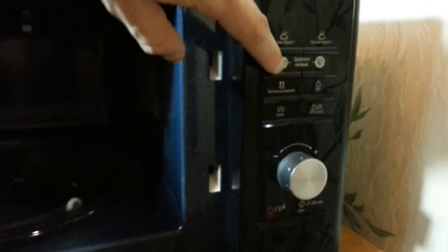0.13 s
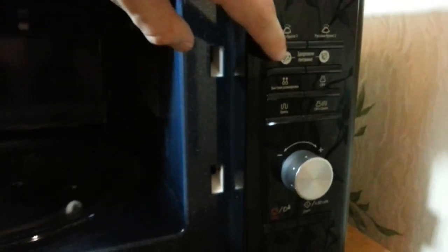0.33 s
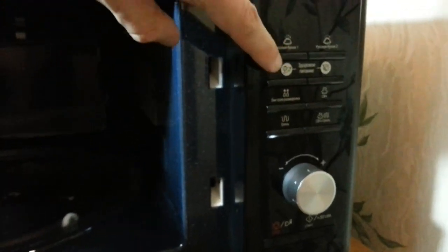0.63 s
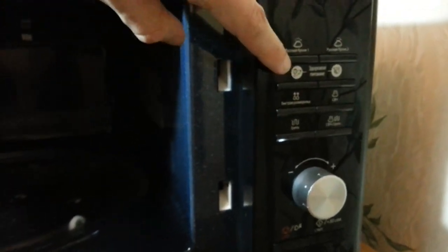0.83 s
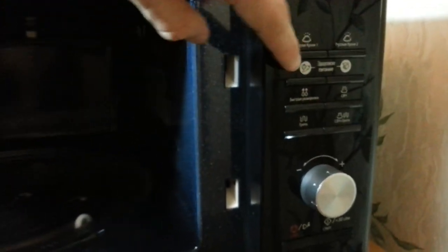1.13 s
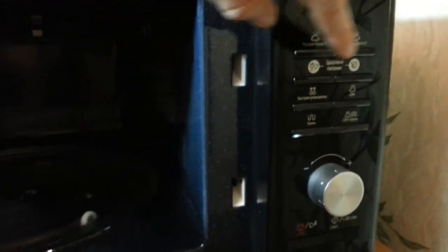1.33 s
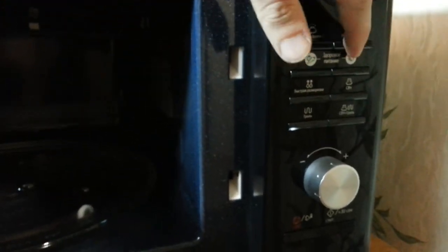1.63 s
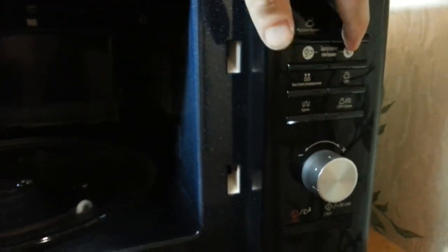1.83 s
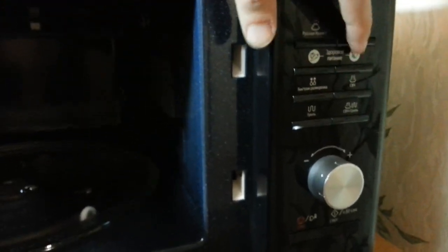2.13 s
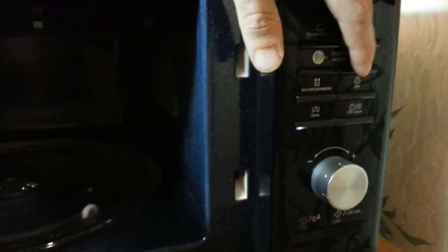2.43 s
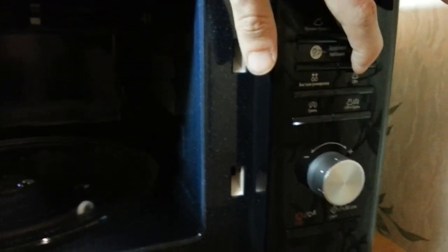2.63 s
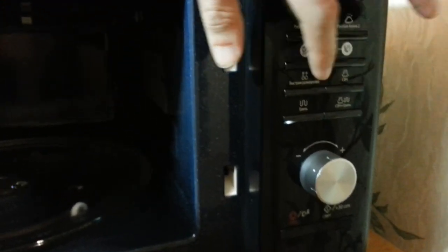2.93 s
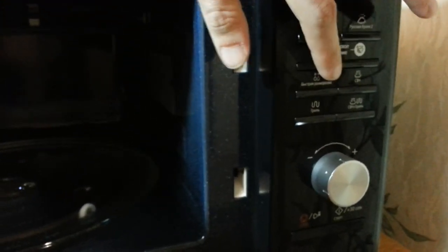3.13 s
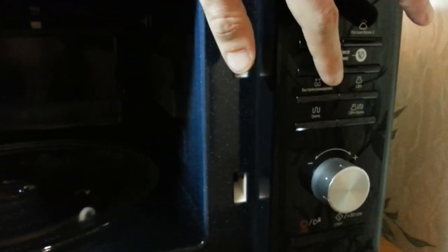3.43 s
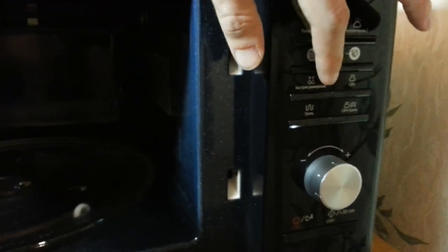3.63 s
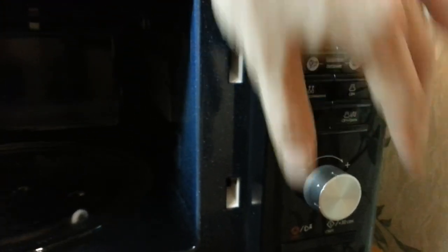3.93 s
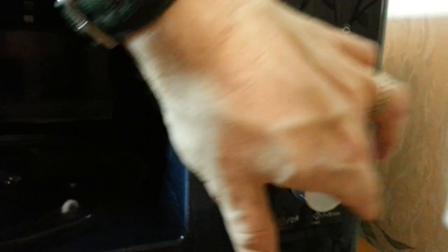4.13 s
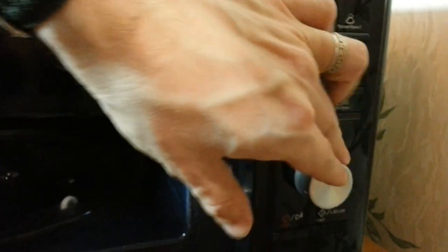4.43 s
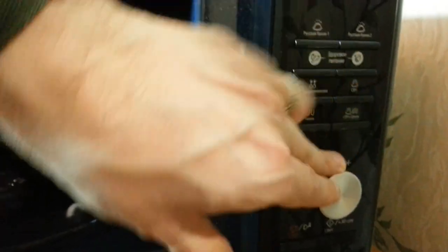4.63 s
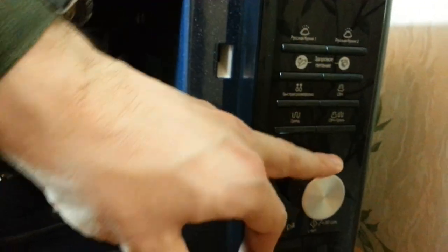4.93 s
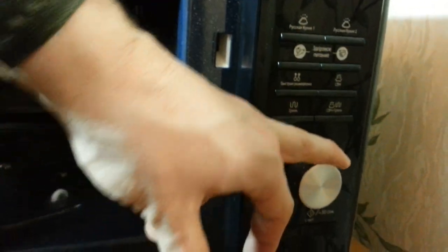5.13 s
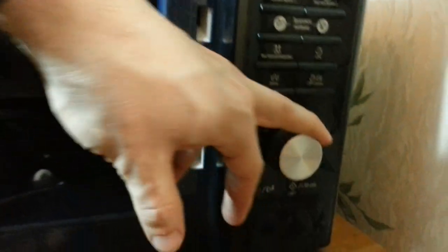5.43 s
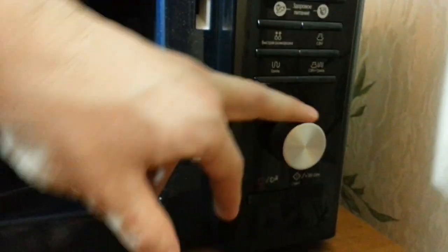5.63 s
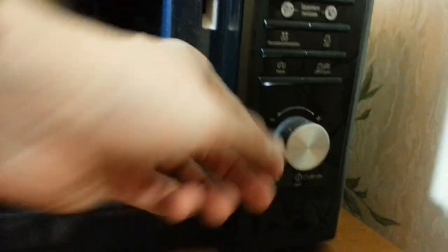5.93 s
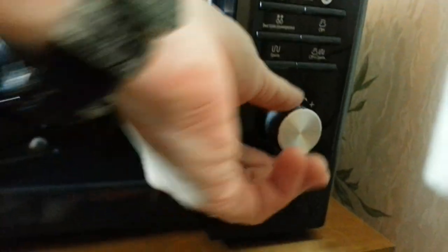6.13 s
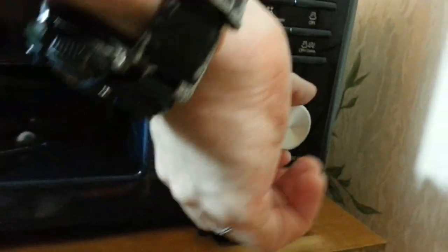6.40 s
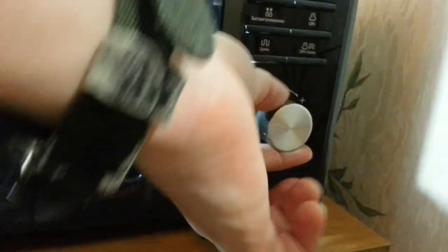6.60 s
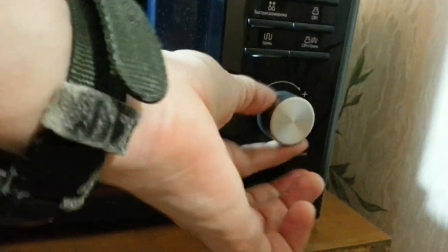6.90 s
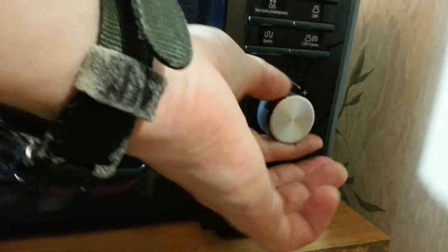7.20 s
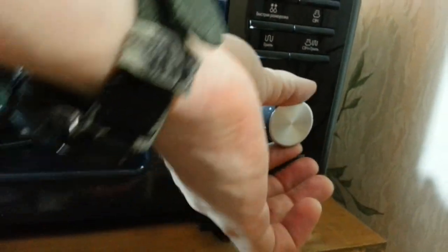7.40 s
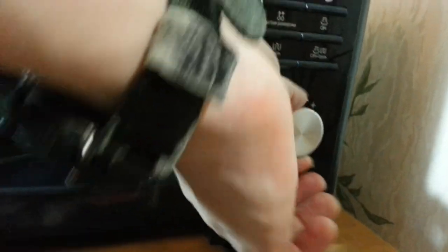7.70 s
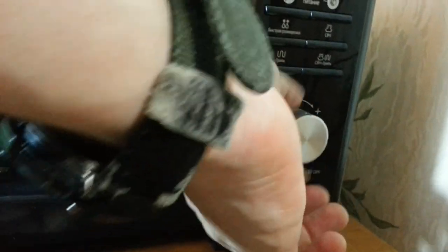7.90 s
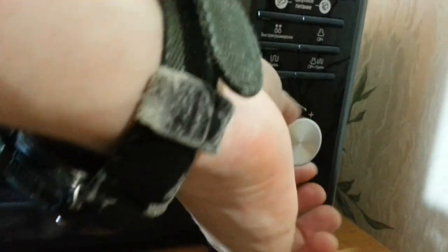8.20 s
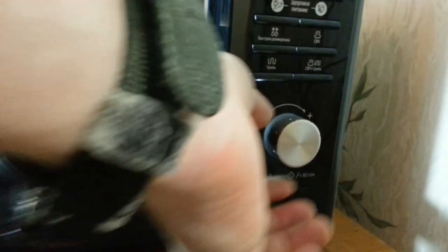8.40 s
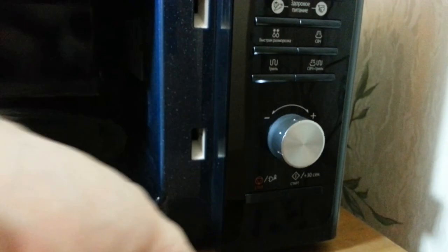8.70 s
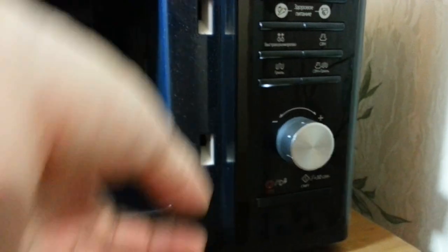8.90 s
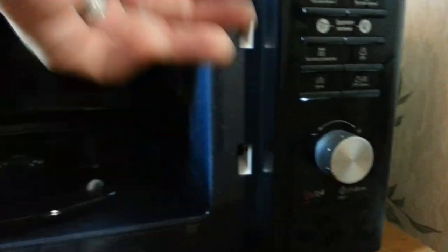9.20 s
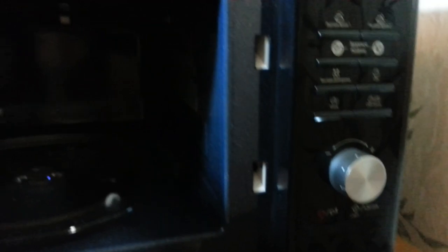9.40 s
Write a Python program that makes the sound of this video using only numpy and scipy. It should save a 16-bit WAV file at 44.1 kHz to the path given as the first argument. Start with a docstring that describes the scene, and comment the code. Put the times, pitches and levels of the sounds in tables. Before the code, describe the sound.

Firm plastic button clicks and finger knocks on a microwave panel over a low wavering hum, then a notched dial rasping and a strap ticking.

```python
"""A hand works the front panel of an open microwave oven in a small room, close to the microphones.
A low wavering hum, summed from steady tones and dull noise, and a faint hiss of noise run throughout.
Push buttons, as noise bursts and clicks ringing the panel, snap over them and swell the hum; soft
brushes of grainy noise and thin falling squeaks come between. Later, lumpy noise rumbles in the case,
the dial rasps through its soft steps in swells of slips, and a watch strap ticks in tiny bright snaps."""
import sys
import numpy as np
from scipy import signal
from scipy.fft import rfft, irfft
from scipy.io import wavfile

SR = 44100
rng = np.random.default_rng(int(sys.argv[2]) if len(sys.argv) > 2 else 0)


def put_to_file(sound):
    """Save the sound as 16-bit audio at rate SR, in the file named by the first command-line argument."""
    columns = np.atleast_2d(sound).T  # one column per channel
    safe = np.clip(columns, -1, 1)
    whole_steps = np.round(safe * 32767)
    wavfile.write(sys.argv[1], SR, whole_steps.astype(np.int16))


N = 421155  # length in samples

# Likeness of left and right noise. Each row: frequency in Hz, correlation from 0 to 1.
LIKENESS = [(50, 0.94), (130, 0.88), (300, 0.6), (640, 0.54), (1400, 0.033), (15000, 0.034)]
# Steady tones of the hum. Each row: frequency in Hz, level in dB, left-right difference in dB.
HUM_TONES = [(48.4, -66, 9.5), (72.8, -70.5, 2), (99.8, -53.5, 8), (124, -67.5, 0), (218.8, -59.5, 6.5),
             (345, -73.5, 1.5)]
# Relative course of the hum between blows. Each row: time in seconds, level in dB.
HUM_COURSE = [(0.0, -59), (0.66, -61), (1.04, -54.5), (1.62, -59), (2.1, -55.5), (2.47, -56.5),
              (3.27, -57.5), (4.18, -59), (4.6, -55.5), (4.76, -57.5), (5.8, -55.5), (6.38, -58),
              (6.99, -55.5), (9.55, -59.5)]
# Spectrum of the dull drone. Each row: frequency in Hz, density in dB per Hz.
DRONE_SPECTRUM = [(20, -22), (45, -12), (80, -7), (120, -10), (170, 0.5), (230, -2.5), (340, -5),
                  (450, -11.5), (700, -32.5), (1500, -33.5)]
# Spectrum of the room hiss. Each row: frequency in Hz, density in dB per Hz.
AIR_SPECTRUM = [(240, -23.5), (400, -3), (1120, -17), (1370, -16.5), (1470, -18.5), (2090, -17.5),
                (4010, -18), (4390, -20.5), (13900, -23), (15000, -36)]
# Button presses and finger knocks. Each row: start in seconds, snap level in dB, then thump, knock
# and edge in dB against the snap, knock pitch in Hz, snap pitch in Hz.
BLOWS = [(0.055, -45.5, -4, -3, -15.5, 703, 2440), (0.5833, -17.5, -22.5, -22, -13, 1260, 2500),
         (0.7717, -38, -3.5, -6, -17.5, 587, 3130), (0.8903, -20, -23.5, -21, -19, 1360, 2320),
         (1.0192, -39.5, 0, -5.5, -20.5, 580, 2240), (1.0919, -17, -19.5, -23.5, -15.5, 1255, 2500),
         (1.2385, -43.5, 4.5, -4, -19, 606, 2180), (1.806, -18, -18.5, -22, -16, 666, 2230),
         (1.9558, -30, -6, -9, -9.5, 960, 2440), (2.0474, -19, -19.5, -18.5, -18, 1440, 2020),
         (2.2097, -26.5, -6, -12, -10.5, 656, 1760), (2.368, -33.5, -20.5, -24.5, -14, 640, 1760),
         (2.6959, -13, -22, -24, -18.5, 670, 2980), (2.877, -29.5, -8.5, -8.5, -17.5, 740, 1790),
         (2.8959, -39.5, -16.5, -14, -9.5, 830, 1800), (3.1974, -14.5, -26, -21, -15.5, 910, 2780),
         (3.34, -21.5, -10, -14.5, -6, 650, 2870), (3.36, -31, -17, -10, -32, 576, 2280),
         (3.8235, -46, -2, -10.5, -20, 783, 2160), (4.148, -37, -14.5, -17.5, -11, 556, 2480),
         (4.251, -48.5, -18.5, -27, -11, 522, 1970), (4.4033, -24.5, -7, -18, -11, 1130, 2370),
         (5.2318, -57, 11.5, 2.5, -15, 630, 2300), (5.46, -56.5, -8.5, -9, -9.5, 920, 2600),
         (5.7765, -38, -0.5, -6, -22, 680, 2150), (6.2094, -47.5, -5, -10, -20, 592, 2180),
         (6.6597, -46.5, 1, -11.5, -14, 530, 3060), (6.8785, -40.5, -2, -12, -22, 574, 2480),
         (7.1288, -46.5, 8.5, -5.5, -11, 670, 3200), (7.194, -48.5, 6.5, -6, -20, 507, 2690),
         (7.2615, -44.5, -3, -9.5, -17, 754, 2960), (8.7829, -24.5, -16, -16, -9, 590, 2150)]
# Decay of a blow in thump, knock, snap, edge and sparkle. Each row: low and high limit in Hz, rise in
# seconds, crack in dB against the tail, crack T60 in seconds, tail T60 in seconds, band level in dB.
BLOW_BANDS = [(135, 364, 0.00096, 13, 0.012, 0.4, -5.5), (475.6, 1365, 0.0018, -0.5, 0.045, 0.29, -2),
              (1567, 4150, 0.00044, 7, 0.029, 0.18, -14.5), (4290, 6980, 0.00023, 12, 0.038, 0.16, -3),
              (8260, 12800, 0.000217, 10, 0.016, 0.16, -7)]
# Resonances of the case and its plastic panel. Each row: frequency in Hz, width in Hz, gain in dB.
PANEL_MODES = [(152, 5.3, 7.5), (180.5, 4, 0.5), (226.8, 36, 6.5), (244, 30, -3), (328, 39, 0),
               (603, 120, 0.5), (705, 44, -4.5), (808, 5.1, 5.5), (938, 16, 4), (1288, 7.4, -21.5),
               (1760, 21, -13), (2030, 26, 7), (2200, 16, 4), (2650, 130, -3), (2840, 240, -9.5),
               (3340, 50, -8.5), (5330, 330, -5)]
# Bumps and brushes of hand and sleeve. Each row: start in seconds, peak level in dB before the
# common trim, length in seconds (the peak falls at half of it).
BRUSH_EVENTS = [(0.345, -61, 0.031), (0.452, -55, 0.028), (4.572, -59, 0.1), (4.699, -58.5, 0.027),
                (5.253, -54.5, 0.051), (5.893, -52, 0.026), (6.694, -55.5, 0.043), (7.517, -51, 0.012),
                (8.094, -67, 0.013), (9.095, -60, 0.043), (9.295, -70, 0.025), (9.503, -57, 0.025)]
# Spectrum of a brush. Each row: frequency in Hz, density in dB per Hz.
BRUSH_SPECTRUM = [(100, -33), (230, 16.5), (400, 2), (800, -3.5), (1300, -10.5), (2500, -9.5),
                  (4000, -13.5), (8000, -16.5), (15000, -35)]
# Thin falling squeaks; the rows at 6.64 s and 6.673 s are thin rings of the turning dial, made the same way.
# Each row: start in seconds, length in seconds, first pitch in Hz, fall in Hz, # level in dB before the common
# trim.
SQUEAK_EVENTS = [(0.388, 0.17, 4050, 586, -68.5), (1.466, .23, 4050, 444, -68),
                 (2.347, 0.23, 4480, 902, -67.5), (3.109, 0.056, 4350, 250, -66.5),
                 (4.242, .078, 4350, 252, -67.5), (6.42, 0.087, 4300, 250, -73),
                 (6.64, 0.16, 6470, 150, -68), (6.673, .11, 3300, 101, -63.5),
                 (8.443, 0.12, 4460, 603, -71)]
# Course of the case rumble under the hand. Each row: time in seconds, level in dB before the trim.
RUMBLE_COURSE = [(4.5, -63), (4.61, -53.5), (4.77, -86), (4.99, -58.5), (5.15, -53), (5.38, -61),
                 (5.53, -57), (5.76, -52), (6.31, -70), (6.54, -62), (6.68, -65), (6.93, -66),
                 (7.09, -50.5), (7.21, -51.5), (7.5, -57), (7.87, -57.5), (8.32, -63), (8.6, -65)]
# Spectrum of the rubbing. Each row: frequency in Hz, density in dB per Hz.
RUMBLE_SPECTRUM = [(60, -28), (130, -6), (200, -1), (320, -7.5), (450, -14.5), (900, -20), (1500, -19.5),
                   (4000, -32.5)]
# Turns of the dial. Each row: first step in seconds, last step in seconds, number of steps, each gap
# as a ratio to the one before, first and last level in dB before the trim, extra dB in mid-turn,
# step length in seconds, tilt in dB per octave.
DIAL_TURNS = [(4.946, 5.179, 4, 1.34, -42, -38.5, -2, .021, 2),
              (5.543, 5.758, 6, 0.82, -44.5, -32, 0.5, 0.027, 1.5),
              (6.206, 6.228, 2, 1, -52.5, -53.5, 0, 0.033, 8),
              (6.506, 6.648, 4, 0.98, -42.5, -40.5, -5, .025, 3.5),
              (6.895, 6.913, 2, 1.04, -43.5, -39, 0, 0.03, -3.5),
              (6.956, 7.075, 4, 1.06, -41, -36.5, -7.5, 0.017, 0),
              (7.205, 7.223, 2, 1, -45, -49.5, 0, 0.027, 3.5),
              (7.316, 7.458, 4, 1.29, -43, -49, 7, .02, 0.5), (7.685, 7.803, 4, 1, -45, -43, 0.5, 0.025, 0),
              (8.172, 8.252, 3, 1.1, -49, -41.5, -1.5, .019, 1.5)]
# Spectrum of the slips before they ring. Each row: frequency in Hz, density in dB per Hz.
RASP_SPECTRUM = [(530, -4.5), (900, -13), (1360, -3.5), (1820, -5.5), (2180, -3.5), (3360, -3.5),
                 (4010, -2.5), (4360, -4), (5450, 1), (8730, -10.5), (11400, -12.5), (15000, -26)]
# Resonances of the knob. Each row: frequency in Hz, width in Hz, gain in dB.
KNOB_MODES = [(930, 62, 6), (3000, 310, -3.5), (4100, 600, -1), (4800, 800, -7), (6860, 1000, 1)]
# Watch strap ticks; the row at 7.0654 s is a loud snap of the dial dropping into a notch, made the same way.
# Each row: start in seconds, level in dB, left-right difference in dB, room in dB; # level and room are further
# altered by nearness.
STRAP_TICKS = [(5.7555, -39, 5, 13), (6.5515, -50, 8, -3), (6.599, -38, -14, 9), (6.6394, -35, 11, -6),
               (7.0654, -43, -3, 2), (8.244, -35.5, 10, 7), (8.2833, -33.5, 11, 9),
               (8.3514, -33.5, 20, 9.5), (8.382, -18.5, 21, -10)]
# Spectrum of a tick before its tilt. Each row: frequency in Hz, gain in dB.
TICK_SPECTRUM = [(200, 29), (1000, 11), (3000, 4), (5000, 10), (8000, 2.5), (12500, 6), (15000, 6)]
# Unequal colour of the two microphone ports. Each row: frequency in Hz, left-right difference in dB.
PORT_COLOUR = [(100, -2.5), (220, 1), (650, -0.5), (1300, 1.5), (2400, 1), (4400, 3), (6800, -7),
               (8500, -3.5), (12000, -2)]


def gain_of(db):
    """Logarithmic level: decibels become an amplitude factor."""
    return 10 ** (np.asarray(db) / 20)


def evened(x):
    """Normalization: scales to unit rms."""
    return x / np.sqrt(np.mean(x ** 2) + 1e-20)


def read(points, hz):
    """Interpolation of a spectrum along a logarithmic frequency axis."""
    f, value = np.transpose(points)
    return np.interp(np.log(hz + 1), np.log(f + 1), value)


def add(mix, s, sound):
    """Superposition: adds a sound to the mix from time s."""
    part = mix[:, max(round(s * SR), 0):][:, :sound.shape[1]]
    part += sound[:, :part.shape[1]]


def panned(balance_db):
    """Intensity stereo: left and right gains for a level difference."""
    return evened(gain_of(np.array([[.5], [-.5]]) * balance_db))


def coloured(x, points, tilt_db=0):
    """Linear filtering: shapes the spectrum and tilts it by dB per octave above 1000 Hz."""
    hz = np.fft.rfftfreq(x.shape[-1], 1 / SR)
    octaves = np.log2(np.maximum(hz, 1000) / 1000)
    return irfft(rfft(x) * gain_of(read(points, hz) + tilt_db * octaves), x.shape[-1])


def noise(size):
    """Diffuse-field coherence: white noise alike at both microphones in the bass, less so in the treble."""
    a, b = rfft(rng.standard_normal((2, size)))
    same = read(LIKENESS, np.fft.rfftfreq(size, 1 / SR))
    return irfft(np.array([a, same * a + np.sqrt(1 - same ** 2) * b]), size)


def drift(rate):
    """Low-passed randomness: a smooth curve of unit rms with about `rate` turns a second."""
    hz = np.fft.rfftfreq(N, 1 / SR)
    return evened(irfft(rfft(rng.standard_normal(N)) * np.exp(-(hz / rate) ** 2), N))


def ringing(x, modes):
    """Resonance: modes (Hz, width in Hz, dB) ring on top of what drives them."""
    out = x
    for hz, width, db in modes:
        out = out + gain_of(db) * signal.lfilter(*signal.iirpeak(hz, hz / width, SR), x)
    return out


def room(x, t60):
    """Reverberation: convolution with dense, exponentially dying reflections of unit energy."""
    t = np.arange(SR // 4) / SR
    tail = noise(len(t)) * gain_of(-60 * t / t60) * (1 - np.exp(-t / .002))
    return signal.fftconvolve(x, tail / np.linalg.norm(tail[0]), axes=1)[:, :x.shape[1]]


def hum(flutter_db=2.5, flutter_rate=18, throb_hz=6.4, throb_db=-0.5,
        swell_db=-40, swell_per_db=0.24, swell_rise_s=0.0044, swell_fall_s=0.1,
        drone_db=-63, drone_balance_db=8.0, wander_turns=.08, wander_rate=5):
    """Amplitude modulation: mains and motor tones and a drone throb together and swell after each blow."""
    t = np.arange(N) / SR
    power = gain_of(np.interp(t, *np.transpose(HUM_COURSE))) ** 2
    after = t[:SR]
    swell_shape = (1 - np.exp(-after / swell_rise_s)) * np.exp(-after / swell_fall_s)
    for s, db, thump_db, *_ in BLOWS:
        # a heavy blow swells the hum more
        swell = gain_of(swell_db + swell_per_db * (db + thump_db)) * swell_shape
        add(power[None], s, swell[None] ** 2)
    waver_db = flutter_db * drift(flutter_rate) + throb_db * np.sin(2 * np.pi * throb_hz * t)
    level = evened(np.sqrt(power) * gain_of(waver_db))
    sound = gain_of(drone_db) * evened(coloured(noise(N), DRONE_SPECTRUM)) * panned(drone_balance_db)
    for hz, db, side_db in HUM_TONES:
        turns = hz * t + rng.random() + wander_turns * drift(wander_rate)
        sound += gain_of(db) * panned(side_db) * np.sqrt(2) * np.sin(2 * np.pi * turns)
    return level * sound


def air(level_db=-72, waver_db=-2.0, waver_rate=8, balance_db=3.5):
    """Broadband noise: the faint, slightly wavering hiss of the room."""
    hiss = evened(coloured(noise(N), AIR_SPECTRUM))
    return gain_of(level_db + waver_db * drift(waver_rate)) * hiss * panned(balance_db)


def presses(blow_s=0.017, rise_s=.0005, lag_s=.0008, balance_db=3.0,
            knock_width_hz=110, knock_ring_db=7, snap_width_hz=200, snap_ring_db=3,
            sparkle_offset_db=-7.5, sparkle_per_thump=.3, hard_offset_db=0.5, hard_per_db=0.83,
            pad_s=0.0013, faint_db=-34, faint_s=.009, faint_per_db=.5,
            spike_db=22, spike_s=0.001, click_db=34, push_db=6.5, push_per_db=1, usual_thump_db=-40):
    """Impact excitation: each blow is a short crack, then a longer ring of case and room, band by band."""
    out, t = np.zeros((2, N)), np.arange(16384) / SR - .025
    after = np.maximum(t, 0)
    blow = np.exp(-(t / blow_s) ** 4) * (t > 0)  # window over which the level is set
    # a faint noise swells just before each blow and fades after it
    faint_swell = gain_of(faint_db) * np.exp(-abs(t) / faint_s)
    impulse = signal.unit_impulse(len(t), np.argmax(t > rise_s))
    filters = [signal.butter(3, [lo, hi], "band", fs=SR, output="sos") for lo, hi, *_ in BLOW_BANDS]
    for s, db, thump_db, knock_db, edge_db, knock_hz, snap_hz in BLOWS:
        shake, sound = noise(len(t)), 0
        sparkle_db = edge_db + sparkle_offset_db + sparkle_per_thump * thump_db
        hard_db = hard_offset_db + hard_per_db * db  # weaker blows are softer
        # each spot on the panel has its own two notes
        own_notes = [(knock_hz, knock_width_hz, knock_ring_db), (snap_hz, snap_width_hz, snap_ring_db)]
        modes = [*PANEL_MODES, *own_notes]
        # the fingertip cushions thumping blows; hard ones start with a spike and a clean click
        cushion = pad_s * gain_of(min(thump_db - hard_db, 0))
        spike = gain_of(spike_db + hard_db) * np.exp(-after / spike_s)
        click = gain_of(click_db + hard_db) * impulse
        # a strong, heavy blow pushes the case in one clean pulse
        push = gain_of(push_db + push_per_db * (db + thump_db - usual_thump_db))
        # this faint noise grows half as much in dB as the blow, so it counts for more in weak ones
        faint = faint_swell * gain_of(-faint_per_db * db)
        parts_db = (thump_db, knock_db, 0, edge_db, sparkle_db)
        for band, row, part_db in zip(filters, BLOW_BANDS, parts_db):
            lo, hi, rise, crack_db, crack_t60, t60, ring_db = row
            fall = gain_of(crack_db - 60 * after / crack_t60) + gain_of(-60 * after / t60)
            fall = fall + spike * (lo > 1000)
            onset = 1 - np.exp(-after / (rise + cushion))
            drive = shake * (fall * onset + faint) + click * (push if lo < 300 else 1)
            band_modes = [mode for mode in modes if lo / 1.2 < mode[0] < hi * 1.2]
            ring = signal.sosfilt(band, ringing(drive, band_modes))
            strength = np.sqrt(np.average(ring ** 2, axis=1, weights=blow))[:, None]
            sound = sound + gain_of(db + part_db + ring_db) * ring / strength
        add(out, s + lag_s + t[0], sound)
    return out * panned(balance_db)


def brushes(trim_db=-3, grain_db=3, balance_db=4):
    """Friction noise: soft grainy swells as the hand shifts its hold."""
    out, t = np.zeros((2, N)), np.arange(SR // 3) / SR
    for s, db, length in BRUSH_EVENTS:
        u = 2 * t / length
        swell = u * np.exp(1 - u)
        # each slip holds its strength for 200 samples
        slips = gain_of(grain_db * np.repeat(rng.standard_normal(len(t)), 200)[:len(t)])
        rub = evened(coloured(noise(len(t)) * slips, BRUSH_SPECTRUM))
        add(out, s, gain_of(db + trim_db) * swell * rub)
    return out * panned(balance_db)


def squeaks(trim_db=-4):
    """Noise-modulated carrier: thin, breathy, unsteady whistles that slide down."""
    out = np.zeros((2, N))
    smooth = signal.butter(2, 190, fs=SR, output="sos")
    for s, length, hz, fall_hz, db in SQUEAK_EVENTS:
        t = np.arange(int(length * SR)) / SR
        blur = signal.sosfilt(smooth, noise(SR // 2))[:, -len(t):]
        whistle = np.sin(2 * np.pi * np.cumsum(hz - fall_hz * t / length) / SR)
        fade = signal.windows.tukey(len(t), .8)
        add(out, s, gain_of(db + trim_db) * evened(blur * whistle) * fade)
    return out + .5 * room(out, .25)


def handling(trim_db=-1, lumps_db=4.5, lump_rate=22, balance_db=4):
    """Forced vibration: lumpy rubbing of the hand rings the low resonances of the case."""
    s, db = np.transpose(RUMBLE_COURSE)
    level = gain_of(np.interp(np.arange(N) / SR, s, db, left=-np.inf, right=-np.inf))
    rub = coloured(noise(N) * gain_of(lumps_db * drift(lump_rate)), RUMBLE_SPECTRUM)
    body = ringing(rub, [mode for mode in PANEL_MODES if mode[0] < 1000])
    return gain_of(trim_db) * level * evened(body) * panned(balance_db)


def steps():
    """Geometric timing: steps of each turn as (s, dB, length s, tilt), their gaps growing or shrinking."""
    for first, last, count, gap_ratio, first_db, last_db, arch_db, length, tilt_db in DIAL_TURNS:
        way = np.append(0, np.cumsum(gap_ratio ** np.arange(count - 1.0)))
        for u in way / way[-1]:
            db = first_db + u * (last_db - first_db) + arch_db * np.sin(np.pi * u)
            yield first + u * (last - first), db, length, tilt_db


def dial(trim_db=-7.0, grain_db=2.0, room_db=-9, t60=0.29, balance_db=3.0, width_share=0.47, roundness=1.14):
    """Stick-slip: tiny slips swell, peak as the dial drops into each notch, and ring the knob."""
    out, t = np.zeros((2, N)), np.arange(SR // 6) / SR - 1 / 12
    for s, db, length, tilt_db in steps():
        swell = np.exp(-abs(t / (length * width_share)) ** roundness)
        # each slip holds its strength for 48 samples
        slips = gain_of(grain_db * np.repeat(rng.standard_normal(len(t)), 48)[:len(t)])
        rasp = evened(ringing(coloured(noise(len(t)) * slips, RASP_SPECTRUM, tilt_db), KNOB_MODES))
        add(out, s + t[0], gain_of(db + trim_db) * swell * rasp)
    return (out + gain_of(room_db) * room(out, t60)) * panned(balance_db)


def strap(trim_db=-6, snap_s=0.0015, t60=0.11, near_db=12, near_gain_db=6, near_tilt_db=4.0, near_dry_db=12.7):
    """Proximity: tiny bright snaps, shorter, brighter and drier the nearer to one microphone."""
    out, t = np.zeros((2, N)), np.arange(SR // 5) / SR
    for s, db, balance_db, room_db in STRAP_TICKS:
        near = min(abs(balance_db) / near_db, 1) ** 2  # 0 between the microphones, 1 close to one
        shape = np.exp(-abs(t - .0012) / snap_s * (1 + near))
        tick = coloured(noise(len(t)) * shape, TICK_SPECTRUM, near * near_tilt_db) * (t < .02)
        tick *= np.linalg.norm(shape) / np.linalg.norm(tick, axis=1, keepdims=True)
        tick *= gain_of(db + trim_db + near * near_gain_db)
        reflections = gain_of(room_db - near_dry_db * near) * room(tick, t60)
        add(out, s, tick * panned(balance_db) + reflections)
    return out


def scene():
    """Superposition of all sources at the two microphones."""
    return hum() + air() + presses() + brushes() + squeaks() + handling() + dial() + strap()


def record(dry, edge_hz=15050):
    """Transducer response: the colour of each port, then a low-pass band limit."""
    hz = np.fft.rfftfreq(N, 1 / SR)
    ports = gain_of(np.array([[.5], [-.5]]) * read(PORT_COLOUR, hz))
    heard = irfft(rfft(dry) * ports, N)
    low_pass = signal.firwin(301, edge_hz, window=("kaiser", 8), fs=SR)
    return signal.oaconvolve(heard, low_pass[None], "same")


dry = scene()
out = record(dry)
put_to_file(out)
```